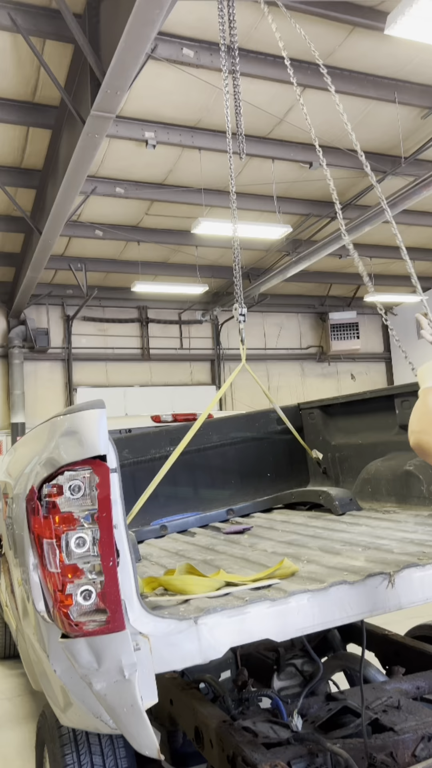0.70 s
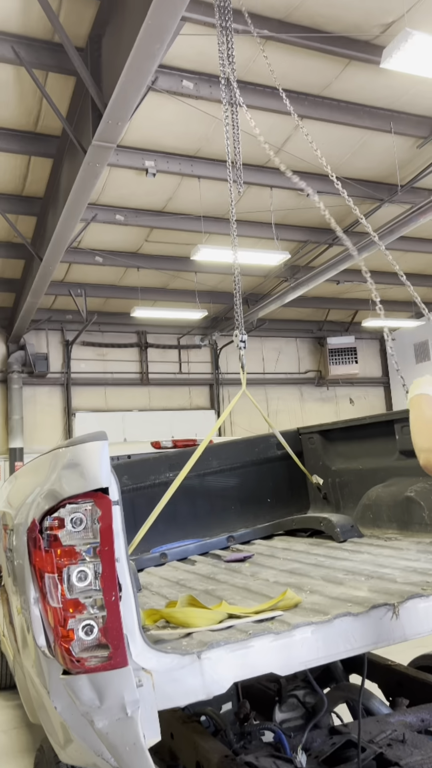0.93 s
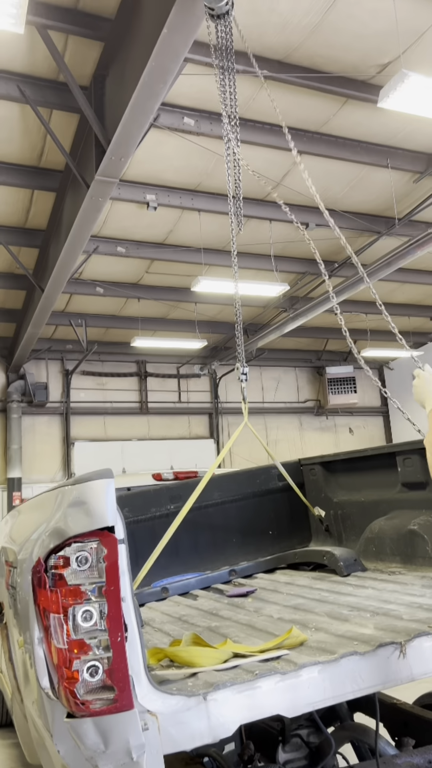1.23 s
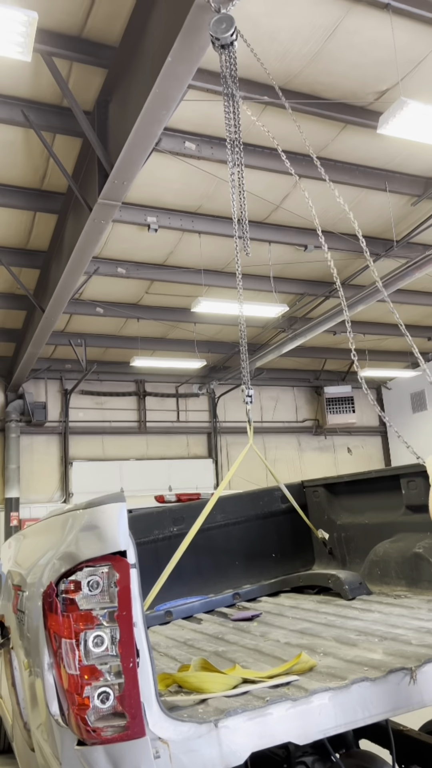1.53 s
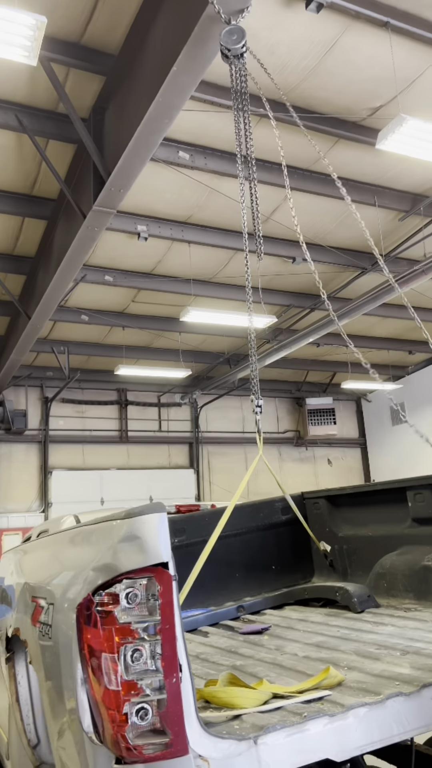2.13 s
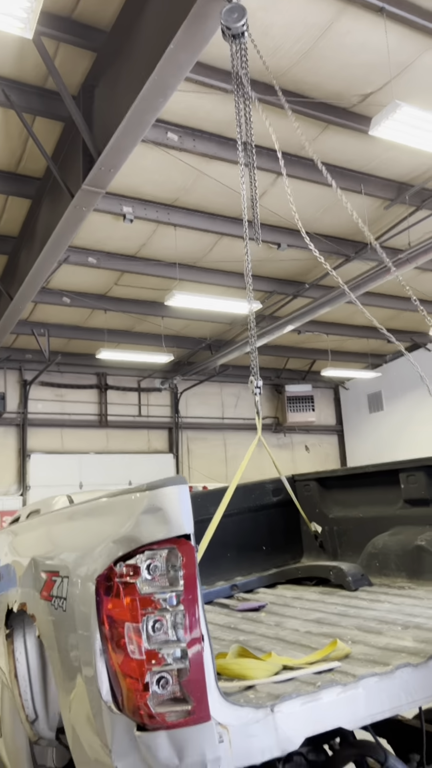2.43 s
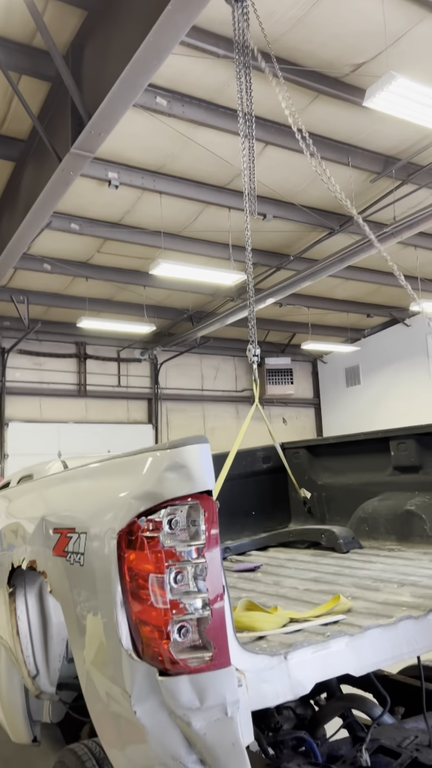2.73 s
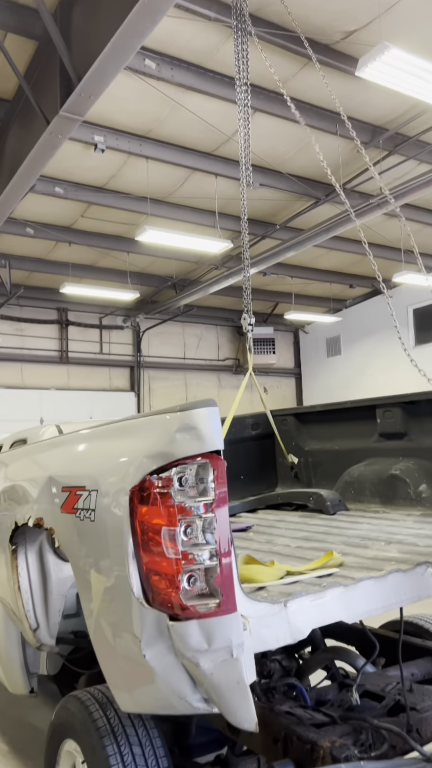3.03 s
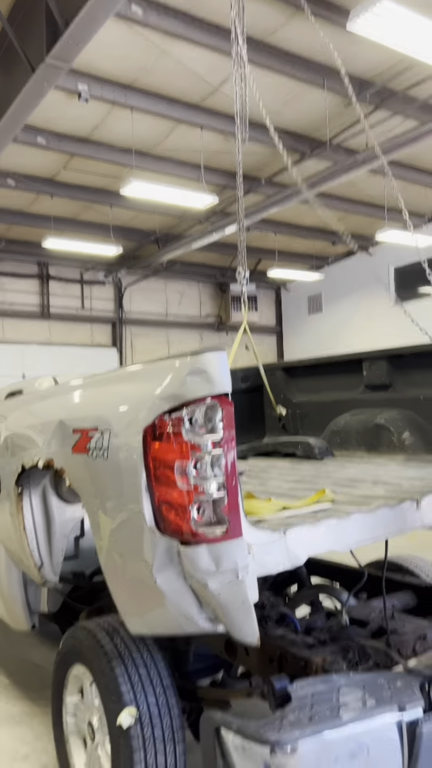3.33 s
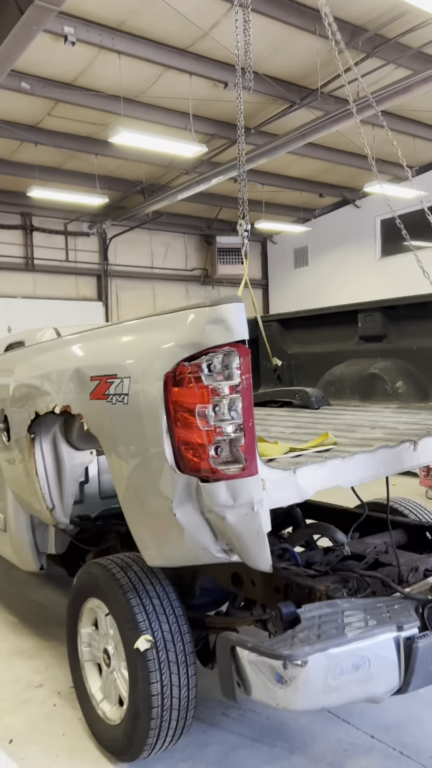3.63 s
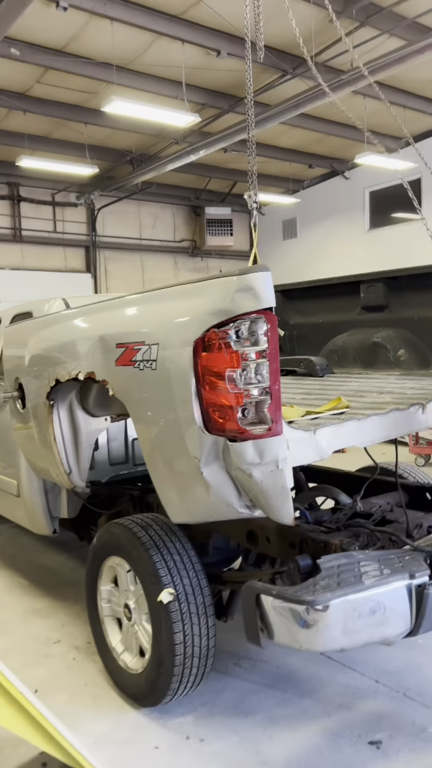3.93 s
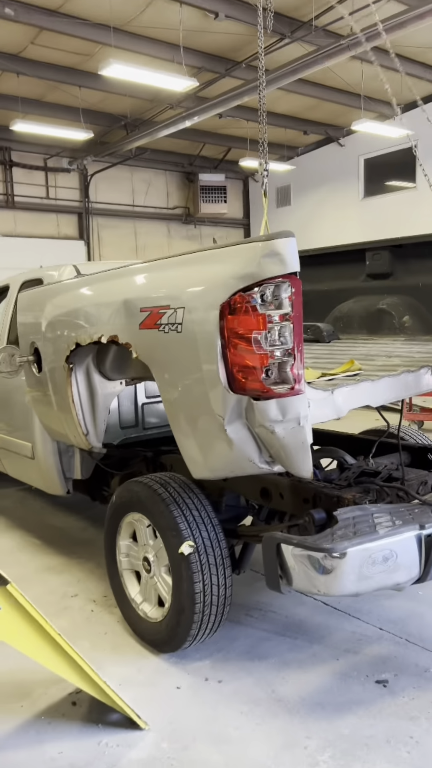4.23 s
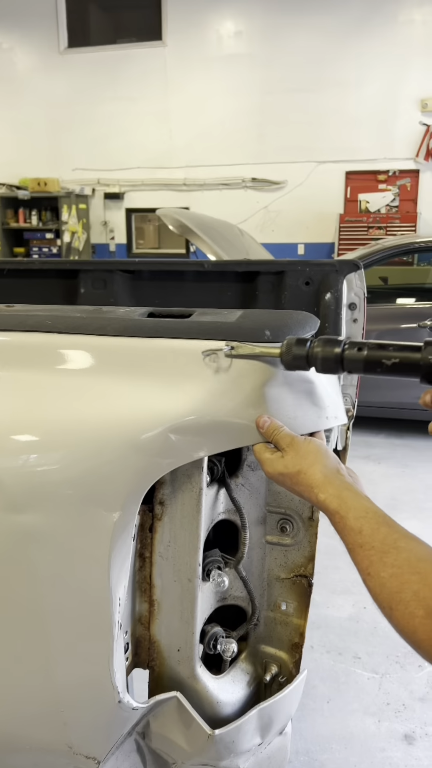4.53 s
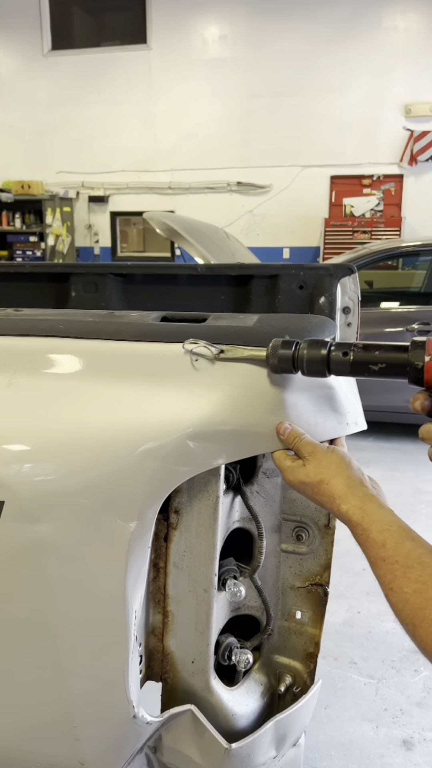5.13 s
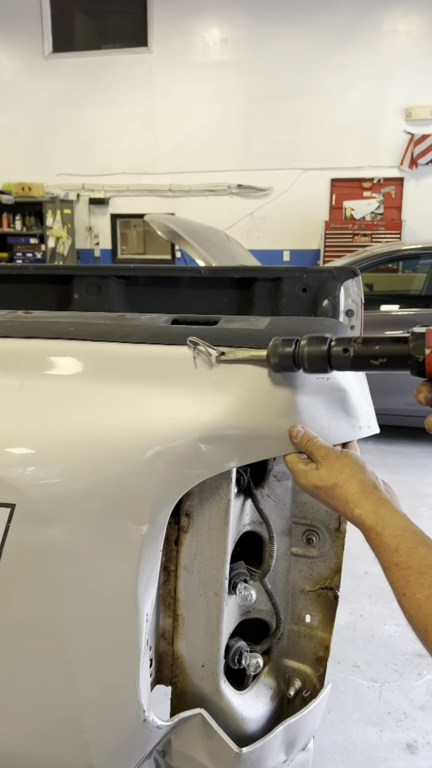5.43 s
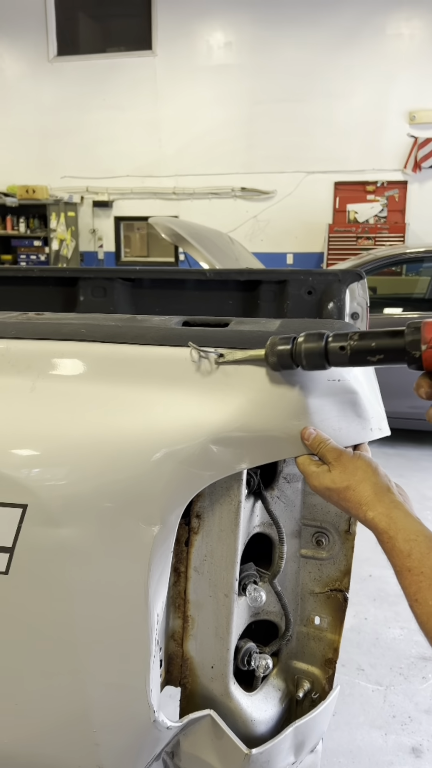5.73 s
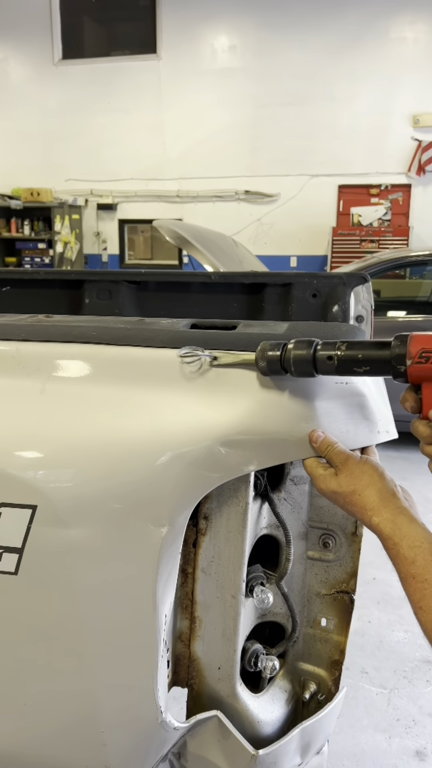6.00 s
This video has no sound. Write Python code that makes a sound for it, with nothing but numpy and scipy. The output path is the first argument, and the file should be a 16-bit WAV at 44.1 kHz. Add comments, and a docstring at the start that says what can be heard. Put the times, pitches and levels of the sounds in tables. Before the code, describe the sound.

A chain hoist clinks and rattles in repeated pulls, then a pneumatic hammer abruptly starts chiseling sheet metal close by.

```python
"""Chain hoist and pneumatic hammer in a body shop.

A chain is hauled hand over hand under a steel roof; each impact excites the modes of the links
and the hoist's housing, and the hall reverberates. Then, abruptly, a pneumatic hammer close by
drives its chisel into the sheet-metal side of a truck bed, about thirty blows a second, slowing
while it is leaned on harder. The sheet radiates bending waves as it rings, buckles and tears."""
import sys
import numpy as np
from scipy import signal
from scipy.fft import rfft, irfft
from scipy.io import wavfile
from scipy.ndimage import uniform_filter1d

SR = 44100
rng = np.random.default_rng(int(sys.argv[2]) if len(sys.argv) > 2 else 0)


def transcribe(signal):
    """Save signal, clipped to [-1, 1], as a 16-bit WAV file at the path in sys.argv[1]."""
    frames = np.atleast_2d(signal).T
    limited = np.clip(frames, -1, 1)
    pcm = np.round(limited * 32767).astype(np.int16)
    wavfile.write(sys.argv[1], SR, pcm)


N = 377496

FIRST_BLOW_S, CREASE_GIVES_S = 4.4708, 4.78
SLACK_DB = -46  # the chain keeps jingling between pulls

# Levels in all tables are relative: each source applies its own gain.
# force of the hammer's blows: (time [s], level [dB])
BLOW_FORCE = [(4.47, -21), (4.505, -25.5), (4.545, -26.5), (4.9, -25), (5.6, -26), (5.93, -28),
              (6.04, -26.5), (6.4, -27), (6.57, -28), (6.95, -27.5), (7.2, -28), (7.32, -29), (7.5, -27),
              (7.8, -27.5), (8.0, -28), (8.15, -27.5), (8.5, -28)]
# blows that dig in: (time [s], extra strength [dB], thump level [dB])
DEEP_BLOWS = [(4.54, 2, -28), (4.572, 3, -22), (4.604, 2.5, -24), (4.637, -1, -20), (4.702, 4.5, -19),
              (4.735, 0.5, -23), (4.767, 1, -20.5), (5.255, 0.5, -37), (7.12, -0.5, -26)]
# links striking the hoist: (time [s], level [dB], weight of the low ring [dB],
# low note [Hz], its level [dB], high note [Hz], its level [dB])
LINK_IMPACTS = [(0.162, -21.5, -35, 3630, -42, 4810, -42), (0.1908, -16, -25, 3640, -39, 4800, -33),
                (0.2411, -19, -22, 3590, -39, 4700, -31), (0.29, -11, -18, 3670, -41, 4750, -29),
                (0.3238, -16, -13, 3670, -32, 4760, -24.5), (0.5831, -16.5, -14, 3590, -39, 4900, -34),
                (0.6394, -13, -17, 3600, -24, 4840, -31), (0.6839, -12, -6, 3640, -22, 4790, -39),
                (0.8814, -20, -18, 3400, -50, 4780, -46), (0.9175, -18.5, -10, 3530, -47, 4800, -36),
                (0.9841, -20.5, -11, 3570, -46, 4760, -35), (1.042, -10.5, -16, 3610, -43, 4270, -33),
                (1.09, -12.5, -10, 3640, -30, 4320, -37), (1.135, -30, -20, 3420, -32, 4320, -42),
                (1.2371, -23, -31, 3370, -42, 4760, -43), (1.2665, -18, -29, 3410, -43, 4820, -28),
                (1.314, -15.5, -5, 3550, -44, 4800, -31), (1.357, -20.5, 7, 3560, -44, 4810, -30),
                (1.4104, -13.5, -7.5, 3640, -41, 4750, -24), (1.6265, -21.5, -12, 3610, -51, 4380, -39),
                (1.6823, -18.5, -2, 3650, -47, 4270, -39), (1.7404, -15.5, -4, 3430, -43, 4820, -32),
                (1.7898, -15, -5, 3570, -46, 4130, -41), (1.9864, -22, -6, 3650, -50, 4770, -40),
                (2.127, -17.5, 11, 3630, -36, 4740, -39), (2.1545, -19, -8, 3350, -41, 4350, -29),
                (2.2021, -21, -2, 3630, -34, 4700, -36), (2.4226, -19, 7, 3560, -41, 4600, -44),
                (2.4784, -14, -11, 3570, -30, 4770, -33), (2.5208, -15, -5, 3570, -27, 4760, -26),
                (2.7172, -15, -4, 3640, -44, 4680, -33), (2.814, -24, -20, 3560, -40, 4220, -28),
                (2.876, -10, -4.5, 3470, -34, 4600, -35), (2.935, -15, -3, 3510, -41, 4710, -46),
                (3.134, -23.5, -30, 3390, -46, 4820, -46), (3.21, -21.5, -31, 3370, -51, 4730, -39),
                (3.2638, -14, -10, 3390, -30, 4780, -43), (3.3084, -15.5, -12, 3400, -29, 4720, -40),
                (3.5161, -19.5, -4, 3540, -43, 4150, -46), (3.5924, -21, -8, 3320, -46, 4710, -40),
                (3.6592, -14.5, -9, 3630, -38, 4250, -32), (3.6847, -13.5, -25, 3320, -36, 4740, -26),
                (3.7205, -24, -28, 3420, -25, 4820, -33), (4.079, -14, -11, 3640, -37, 4750, -29),
                (4.1593, -20.5, 6, 3620, -34, 4640, -41), (4.3785, -27, -11, 3410, -45, 4360, -44)]
# modes of the links and housing: (frequency [Hz], bandwidth [Hz], level [dB])
HOIST_MODES = [(455, 84, -15), (735, 41, -7), (923, 46, -3), (1080, 77, -11), (1555, 86, -7.5),
               (1705, 57, -6), (2530, 100, -10), (3440, 180, -7.5), (3590, 234, -7), (4257, 215, -7.5),
               (4750, 70, -2.5), (5260, 43, -8), (6370, 230, -2), (7040, 120, -3.5), (7820, 580, -7.5),
               (8550, 80, -23), (8440, 54, -1.5), (8950, 680, -11), (10760, 780, -15), (14200, 2500, -69)]


def hammer():
    """Direct and reverberant sound: sheet and chisel are close, and the boom is mostly direct."""
    blows = blow_times()
    sheet = panel(blows) + singing(blows) + clangs(blows) + thumps(blows) + tearing(blows)
    steel = chisel(blows) + shove(blows) + pings(blows)
    carried = colour(sheet, 1 / np.sqrt(1 + (480 / (bins() + 1)) ** 2))
    return sheet + steel + hall(gain_of(-2) * carried + gain_of(-11.5) * steel) + buffeting()


def blow_times():
    """Quasi-periodic excitation: the piston strikes once a cycle, less regularly under load."""
    # speed of the piston: (time [s], blow rate [Hz])
    blow_rate = [(4.47, 29.05), (4.726, 31.22), (5.259, 30.23), (5.508, 30.5), (5.698, 29.84),
                 (5.904, 31.3), (6.373, 31.5), (6.739, 30.6), (6.88, 30.89), (7.169, 27.27), (7.457, 28.59),
                 (7.603, 26.12), (7.748, 28.06), (7.905, 27.45), (7.98, 28.33), (8.477, 30.91)]
    t = np.arange(FIRST_BLOW_S, N / SR, 1 / SR)
    cycles = np.cumsum(follow(blow_rate, t)[0]) / SR
    blows = np.interp(np.arange(cycles[-1]), cycles, t)
    jitter_s = .00003 + .0005 * leaning(blows) ** 2
    return blows + jitter_s * rng.standard_normal(len(blows))


def leaning(t):
    """Static load: how hard the hammer is leaned on at the times t."""
    # pressure on the tool: (time [s], load [0-1])
    load = [(4.5, 0.64), (4.8, 0.24), (5.5, 0.02), (6.3, 0.14), (6.85, 0.43), (7.05, 0.83), (8.18, 0.88),
            (8.3, 0.14), (8.56, 0.15)]
    return np.clip(follow(load, t)[0], 0, 1)


def panel(blows):
    """Modal response: each blow rings the sheet; load damps the boom and brings out the clang."""
    # bed side: (frequency [Hz], bandwidth [Hz], level unloaded [dB], level loaded [dB])
    panel_modes = [(156.5, 18, 2, -2), (189, 23, 3.5, 2.5), (218.2, 15, 5, 4.5), (256, 10, 2, -10),
                   (302, 29, 2, -5), (383, 43, -0.5, 3.5), (447, 34, -3, -15), (571, 65, -4.5, -6),
                   (652, 35, -6, -1.5), (740, 120, -6, -2), (840, 230, -7.5, -8), (927, 26, -2.5, -9),
                   (1130, 120, -14.5, -7), (1390, 21, -5.5, -6), (1400, 90, -18, -41),
                   (1690, 530, -18, -14), (2290, 430, -13.5, -16), (2745, 210, -16, -15),
                   (3460, 370, -41, -35)]
    # crease that the chisel first bites into: (frequency [Hz], bandwidth [Hz], level [dB])
    crease_modes = [(256, 17, 3.5), (462, 30, -5), (950, 76, -4), (1191, 51, 0.5), (1470, 180, -8),
                    (2650, 60, -14)]
    lean, f = leaning(blows)[:, None], bins() + 1
    hz, width, light_db, leaned_db = np.transpose(panel_modes)
    hz = hz[:, None, None] * (1 - 0.012 * (lean - lean.mean()))  # buckling lowers the modes
    light, leaned = resonances(zip(hz, width, light_db)), resonances(zip(hz, width, leaned_db))
    crease_ring = gain_of(crease(blows))[:, None] * resonances(crease_modes)
    gain = np.hypot((1 - lean) * light + lean * leaned, crease_ring)
    gain /= np.sqrt(1 + (125 / f) ** 8)  # a thin sheet radiates little bass
    skid_db = 7.5 * np.exp(-(blows - FIRST_BLOW_S) / 0.047)  # bright skids on paint until the tip seats
    gain *= gain_of(skid_db[:, None] / (1 + (950 / f) ** 6))
    rings = irfft(causal(gain)[:, None] * edge_reflections(blows))
    uneven_db = (0.5 + 0.6 * leaning(blows)) * rng.standard_normal(len(blows))
    bite_db = sum(db * np.exp(-.5 * ((blows - s) / 0.012) ** 2) for s, db, _ in DEEP_BLOWS)
    level_db = follow(BLOW_FORCE, blows)[0] + uneven_db + bite_db
    out = np.zeros((2, N))
    for s, db, ring in zip(blows, level_db, rings):
        add(out, s, gain_of(db - 10) * evened(ring))
    return out


def edge_reflections(blows, return_s=.0072, smooth_bins=24):
    """Dispersion: bending waves return from the edges with a different delay at each frequency."""
    noise = rng.standard_normal((len(blows) + 1, 2, len(bins()), 2))
    noise = evened(uniform_filter1d(uniform_filter1d(noise, smooth_bins, axis=2), smooth_bins, axis=2))
    lean = leaning(blows)[:, None, None]
    skate = lean[..., None] ** 2  # under load the chisel skates, shifting the wave paths
    creep = np.cumsum((0.012 + 0.06 * skate) * noise[1:], axis=0)
    jitter = (0.003 + 0.045 * skate) * noise[1:]
    paths = evened(noise[0] + creep + jitter)
    linger = 1 - .35 * lean / (1 + (bins() / 1000) ** 4)  # pressure deadens the low echoes
    group_delay = return_s * linger * (.18 + .82 * np.mean(paths ** 2, axis=-1))
    return np.exp(-2j * np.pi * np.cumsum(group_delay, axis=-1) * bins()[1])


def crease(t, rise_db_per_s=40, fall_db_per_s=19.5):
    """Resonance level in dB: the crease rings ever more freely, gives way and is beaten down."""
    since = t - CREASE_GIVES_S
    return 5 + np.minimum(rise_db_per_s * since, -fall_db_per_s * since)


def singing(blows, decay_s=0.016, fade_s=0.19):
    """Selective excitation: single modes ring out as the creeping chisel passes their spot."""
    # sheet modes, silent unless end follows start: (start [s], end [s], frequency [Hz], level [dB])
    sung_modes = [(4.7, 4.6, 345, -30), (4.7, 5.2, 235, -23), (4.5, 5.15, 985, -33), (5.3, 5.7, 770, -43),
                  (4.4, 5.1, 765, -25.5), (4.644, 4.5, 1173, -37), (5.4, 5.2, 1245, -36),
                  (5.2, 6, 942, -31), (5.1, 5.6, 680, -31), (5.847, 7.5, 900, -39), (6, 7.203, 765, -30.5),
                  (5.9, 6.6, 291, -33.5), (5.8, 6.95, 211.8, -31), (8.22, 8.8, 185, -24)]
    t, out = np.arange(4096) / SR, np.zeros((2, N))
    envelope = np.exp(-t / decay_s) * (1 - np.exp(-t / 0.0017))
    for start, end, hz, db in sung_modes:
        for s in blows[(blows > start) & (blows < end)]:
            sunk_hz = hz * (1 - 0.021 * (s - (start + end) / 2))  # the cut slackens the sheet
            ring = envelope * np.sin(2 * np.pi * sunk_hz * t + [[0], [1]])
            swell = min(1, (s - start) / fade_s, (end - s) / fade_s)
            add(out, s, swell * gain_of(db + 0.85 * rng.standard_normal()) * ring)
    return out


def clangs(blows, hz=714, scatter_hz=24, swell_s=0.0031):
    """Buckling: under heavy load each blow gives a hollow clang that dies before the next."""
    # strength of the buckling: (time [s], level [dB])
    buckling = [(6.6, -48), (6.95, -25), (7.15, -28.5), (7.5, -23.5), (7.85, -24), (8.05, -31), (8.56, -34)]
    t, out = np.arange(2048) / SR, np.zeros((2, N))
    swell = t / swell_s * np.exp(1 - t / swell_s)
    for s, db in zip(blows, follow(buckling, blows)[0]):
        detune, uneven_db, phase = rng.standard_normal(3)
        wave = swell * np.sin(2 * np.pi * (hz + scatter_hz * detune) * t + phase + [[0], [1]])
        add(out, s, gain_of(db + uneven_db) * wave)
    return out


def thumps(blows, swell_s=0.0058):
    """Plastic deformation: a blow that digs in dents the sheet with a thump of falling pitch."""
    t, out = np.arange(3000) / SR, np.zeros((2, N))
    hz = 135 + 300 * np.exp(-t / 0.0046)
    wave = np.sin(2 * np.pi * np.cumsum(hz) / SR) * t / swell_s * np.exp(1 - t / swell_s)
    for s, _, db in DEEP_BLOWS:
        nearest_blow = blows[np.argmin(abs(blows - s))]
        add(out, nearest_blow, gain_of(db) * np.outer([1, .3], wave))
    return out


def tearing(blows, half_width_hz=250, decay_s=0.0074):
    """Fracture: each blow rips the steel further, a narrow-band screech that glides as the tear runs."""
    # tears: (start [s], end [s], first frequency [Hz], last frequency [Hz], level [dB])
    tears = [(4.47, 4.68, 3680, 3700, -35), (4.78, 5.22, 2190, 2110, -32.5),
             (4.959, 6.0, 2710, 2455, -31.5), (5.18, 5.52, 3970, 4050, -45),
             (6.45, 6.978, 2730, 2700, -34.5), (7.03, 7.498, 3620, 3450, -35.5)]
    t, out = np.arange(2048) / SR, np.zeros((2, N))
    for start, end, first_hz, last_hz, db in tears:
        for s in blows[(blows > start) & (blows < end)]:
            run = (s - start) / (end - start)
            hz = first_hz + (last_hz - first_hz) * run
            band = 1 / (1 + ((bins(len(t)) - hz) / half_width_hz) ** 2)
            rasp = evened(irfft(rfft(rng.standard_normal((2, len(t)))) * band))
            add(out, s, gain_of(db) * np.sqrt(np.sin(np.pi * run)) * np.exp(-t / decay_s) * rasp)
    return out


def chisel(blows, lead_s=.0036):
    """Broadband impact noise: a spit of air, the crack of piston on chisel, then a fading sizzle."""
    # spectrum of steel striking steel: (frequency [Hz], level [dB])
    steel_spectrum = [(300, -0.5), (1500, 2.5), (2700, -3.5), (4200, 0), (5100, -10.5), (6100, 1),
                      (7000, 1.5), (7900, 2.5), (9000, -1), (11000, -3), (16000, 0.5)]
    t, out = np.arange(2400) / SR - lead_s, np.zeros((2, N))
    crack = 0.96 * np.exp(-abs(t) / 0.0003)
    air = 0.5 * (t < 0)
    sizzle = 0.64 * (t >= 0) * np.exp(-np.maximum(t, 0) / 0.012)
    for s, db in zip(blows, follow(BLOW_FORCE, blows)[0] + 2.5 * leaning(blows)):
        envelope = crack * gain_of(0.81 * rng.standard_normal()) + air + sizzle
        add(out, s - lead_s, gain_of(db + 5) * envelope * rng.standard_normal((2, len(t))))
    return colour(out, evened(gain_of(read(steel_spectrum, bins()))))


def shove(blows, width_s=0.000085):
    """Rarefaction: each blow snaps the sheet inward, one sharp dip in pressure before any ringing."""
    u = np.arange(200) / SR / width_s
    dip, out = -(1 - u) * np.exp(-u), np.zeros((2, N))
    for s, db in zip(blows, follow(BLOW_FORCE, blows)[0] - 4 * leaning(blows)):
        add(out, s, gain_of(db + 13.5) * np.outer([1, 0], dip))
    return out


def pings(blows, rise_hz_per_s=680, decay_s=0.0017):
    """Damped vibration: the chisel's tip rings, rising as it sinks in and fading with the crease."""
    t, out = np.arange(1024) / SR, np.zeros((2, N))
    for s, db in zip(blows, follow(BLOW_FORCE, blows)[0] + .5 * crease(blows)):
        detune, centre, side = rng.standard_normal(3)
        hz = 7750 + rise_hz_per_s * (s - CREASE_GIVES_S) + 90 * detune
        ring = np.sin(2 * np.pi * hz * t) * np.exp(-t / decay_s)
        add(out, s, gain_of(db + 5.5) * np.outer([1 + 0.27 * centre, .5 * side], ring))
    return out


def knocks():
    """Antiphase pulses: some blows bring a low knock of falling pitch, opposite in the two ears."""
    # low knocks: (time [s], level [dB])
    knock_levels = [(4.509, -14), (4.543, -14), (4.608, -18), (4.676, -16), (4.7405, -17), (5.293, -16),
                    (5.525, -26), (5.9832, -14), (6.045, -24), (6.622, -18), (6.653, -20), (6.755, -21),
                    (6.9142, -21), (7.0165, -26), (7.3, -19), (7.336, -21), (7.408, -24), (7.514, -24),
                    (8.0237, -24), (8.302, -24), (8.4001, -28)]
    t, out = np.arange(1500) / SR, np.zeros((2, N))
    hz = 110 + 800 * np.exp(-t / 0.00304)
    swell = (t / 0.0048) ** 2 * np.exp(2 - 2 * t / 0.0036)
    wave = swell * np.sin(2 * np.pi * np.cumsum(hz) / SR)
    for s, db in knock_levels:
        add(out, s - .0045, gain_of(db + 6.5) * np.array([wave, -wave]))
    return out


def buffeting(gust_s=0.026):
    """Amplitude-modulated noise: a low rumble under the hammering, swelling in brief gusts."""
    # gusts: (time [s], level [dB])
    gusts = [(4.68, -40), (4.78, -35), (5.28, -36), (7.13, -39), (7.45, -40), (7.67, -46), (8.179, -43),
             (8.32, -58)]
    t = np.arange(N) / SR
    steady = gain_of(-48.5 - 5.5 * leaning(t))  # quieter while the tool is leaned on
    gusting = sum(gain_of(db) / (1 + ((t - s) / gust_s) ** 2) ** 2 for s, db in gusts)
    rumble = evened(colour(rng.standard_normal((2, N)), resonances([(67.5, 107, 0)]) ** 2))
    return rumble * (steady + gusting) * gain_of(3)


def hoist():
    """Impact excitation: knocks and ticks ring the chain and its housing, high up in the hall."""
    steel = walk(clanks() + colour(rattle(), evened(resonances(HOIST_MODES))))
    notes = clinks()
    return steel + notes + gain_of(-4) * shifting_hall(steel + .5 * notes) + drone()


def clanks():
    """Modal response: each link lands and chatters as it seats; heavy ones wake the housing."""
    t, out = np.arange(4096) / SR, np.zeros((2, N))
    envelope = (np.exp(-t / 0.0082) + 0.34 * np.exp(-t / 0.044)) * (1 - np.exp(-t / 0.00094))
    housing = 1 / (1 + (bins() / 2300) ** 4)
    usual_db = np.median(np.array(LINK_IMPACTS)[:, 2])
    hz, width, mode_db = np.transpose(HOIST_MODES)
    for s, db, weight_db, *_ in LINK_IMPACTS:
        knock = rfft(envelope * rng.standard_normal((2, len(t))), 2 * len(t))
        shift, favour = rng.standard_normal((2, len(hz)))  # each spot detunes and favours other modes
        modes = zip(hz + .4 * width * shift, width, mode_db + 2.5 * favour)
        ring = causal(evened(resonances(modes)))
        add(out, s, irfft(knock * ring * gain_of(db - 7.5 + 0.5 * (weight_db - usual_db) * housing)))
    return out


def clinks(overtones=5, note_decay_s=0.029):
    """Free vibration: every struck link sings its own two notes, with a few brief overtones."""
    t, out = np.arange(8192) / SR, np.zeros((2, N))
    for s, db, _, low_hz, low_db, high_hz, high_db in LINK_IMPACTS:
        hz = rng.uniform(4900, 9800, (overtones, 1))
        rings = np.sin(2 * np.pi * hz * t) * np.exp(-t / 0.0041)
        add(out, s, gain_of(db - 17) * rng.standard_normal((2, overtones)) @ rings)
        for note_hz, note_db in (low_hz, low_db), (high_hz, high_db):
            note = np.sin(2 * np.pi * (note_hz * t + rng.random((2, 1)))) * np.exp(-t / note_decay_s)
            add(out, s, gain_of(note_db - 1) * note)
    return out


def rattle(ticks_per_s=260):
    """Shot noise: links tick against each other at random; under load they shake the housing too."""
    strength = gain_of(4.4 * np.minimum(rng.exponential(1, N), 3.3))
    ticks = strength * (rng.random(N) < ticks_per_s / SR)
    power = signal.lfilter([1], [1, -np.exp(-1 / (0.0024 * SR))], ticks ** 2)
    chatter = evened(np.sqrt(power) * rng.standard_normal((2, N)))
    housing = 1 / (1 + (bins() / 2300) ** 6)
    light = gain_of(haul() - 2) * colour(chatter, np.sqrt(1 - housing))
    heavy = gain_of(haul(unload_db_per_s=67) + 1) * colour(chatter, np.sqrt(housing))
    return light + heavy


def haul(unload_db_per_s=0, speed_up_db_per_s=82, run_out_db_per_s=78):
    """Power summation: the chain's level in dB, as each pull builds up speed and runs out."""
    # hand-over-hand pulls at their fastest: (time [s], level [dB])
    pulls = [(-0.02, -25.5), (0.3, -27), (0.68, -26), (1.07, -29), (1.41, -28), (1.77, -25.5), (2.13, -26),
             (2.5, -27), (2.85, -28.5), (3.29, -27.5), (3.699, -26.5), (4.111, -27.5), (4.5, -24)]
    t, power = np.arange(0, N, 64) / SR, gain_of(SLACK_DB) ** 2
    for s, db in pulls:
        before, after = np.maximum(s - t, 0), np.maximum(t - s, 0)
        pull_db = db - speed_up_db_per_s * before - (run_out_db_per_s + unload_db_per_s) * after
        power = power + gain_of(pull_db) ** 2
    return np.interp(np.arange(N) / SR, t, 10 * np.log10(power))


def walk(x):
    """Listening position: on the way round the truck the housing's low ring grows, its upper recedes."""
    # housing's rings: (frequency [Hz], bandwidth [Hz], starting gain [dB], change [dB/s])
    housing_rings = [(1000, 240, 1.5, 0.5), (1580, 1300, 3, -1.66)]
    t, out = np.arange(N) / SR, x
    for hz, width, start_db, db_per_s in housing_rings:
        ring = 1 / (1 + ((bins() - hz) / (width / 2)) ** 4)
        band = signal.oaconvolve(x, np.fft.fftshift(irfft(ring))[None, 1:], "same", axes=1)
        out = out + band * (gain_of(start_db + db_per_s * t) - 1)
    return out


def shifting_hall(x, tails=3, period_s=1.298):
    """Time-varying reverberation: tails fade in turn, so the colour shifts and no fixed pitch rings."""
    phase = 2 * np.pi * np.arange(N) / SR / period_s
    return sum(hall(x * np.cos(phase + np.pi * k / tails)) for k in range(tails)) * np.sqrt(2 / tails)


def hall(x):
    """Reverberation: sparse reflections of random sign, each band decaying at its own rate."""
    # decay of the hall: (frequency [Hz], time to fall 60 dB [s])
    reverb_times = [(100, 1), (1000, 0.46), (4000, 0.69), (8000, 0.32), (16000, 0.018)]
    taps = rng.choice([-1., 1.], (2, SR)) * (rng.random((2, SR)) < .1)
    hz, t, spectra = signal.stft(taps, SR, nperseg=256)
    build_up = 1 - np.exp(-t / 0.0063)
    decay = gain_of(-60 * t / read(reverb_times, hz)[:, None])
    tail = signal.istft(spectra * build_up * decay, SR, nperseg=256)[1]
    return signal.fftconvolve(x, tail / np.linalg.norm(tail[0]), axes=1)[:, :N]


def drone():
    """Amplitude-modulated noise: a low rumble in the hall that swells with each pull."""
    # spectrum of the rumble: (frequency [Hz], level [dB])
    rumble_spectrum = [(15, -43), (35, -18), (52, -8), (68, 1.5), (85, -2.5), (110, -10), (135, -10.5),
                       (175, -7.5), (230, -18.5), (350, -19.5), (700, -21.5), (2000, -24.5), (16000, -29)]
    rumble = evened(colour(rng.standard_normal((2, N)), gain_of(read(rumble_spectrum, bins()))))
    return rumble * gain_of(-41 + 0.49 * (haul() - SLACK_DB))


def spread(pair, width):
    """Sum and difference: a centre and a side signal become left and right."""
    # the highest treble has almost no centre: (frequency [Hz], centre gain [dB])
    centre_gain = [(11400, -1), (11800, -10), (12300, -38), (16000, -43)]
    centre = colour(pair[:1], gain_of(read(centre_gain, bins())))[0]
    side = colour(pair[1:], gain_of(read(width, bins())))[0]
    return np.array([centre + side, centre - side])


def resonances(modes):
    """Second-order resonators, (frequency [Hz], bandwidth [Hz], level [dB]), summed in power."""
    f = bins() + 1
    powers = (gain_of(db) ** 2 / (1 + ((f * f - hz * hz) / (f * width)) ** 2) for hz, width, db in modes)
    return np.sqrt(sum(powers))


def causal(gain):
    """Minimum phase: the spectrum with this gain that rings only after it is struck."""
    log_gain = np.log(np.maximum(gain, 1e-5))
    mirrored = np.concatenate([log_gain, log_gain[..., -2:0:-1]], -1)
    return np.exp(np.conj(signal.hilbert(mirrored)))[..., :gain.shape[-1]]


def colour(x, gain):
    """Convolution of each channel with a causal filter."""
    return signal.oaconvolve(x, irfft(causal(gain))[None], axes=1)[:, :N]


def bins(size=8192):
    """Frequencies of a filter's bins."""
    return np.fft.rfftfreq(size, 1 / SR)


def gain_of(db):
    """Decibels to amplitude."""
    return 10 ** (np.asarray(db) / 20)


def evened(x):
    """Normalisation to rms 1."""
    return x / np.sqrt(np.mean(x ** 2) + 1e-20)


def read(points, hz):
    """Interpolation of a table at hz, on a log-frequency axis."""
    f, value = np.transpose(points)
    return np.interp(np.log(hz + 1), np.log(f + 1), value)


def follow(rows, t):
    """Interpolation of each column of a table at the times t."""
    s, *columns = np.transpose(rows)
    return [np.interp(t, s, column) for column in columns]


def add(mix, s, sound):
    """Superposition: mixes a two-channel sound in at s seconds."""
    part = mix[:, max(round(s * SR), 0):][:, :sound.shape[1]]
    part += sound[:, :part.shape[1]]


def scene(handover_s=4.463):
    """Stereo image: the hoist gives way to the hammer, a little to the left, with a brief dip in level."""
    # width of the hoist: (frequency [Hz], side gain [dB])
    hoist_width = [(70, -50), (120, -41), (200, -25), (380, -14), (700, -4.5), (1700, -8), (2600, -1.5),
                   (5200, -1.5), (6200, -21.5), (6900, -32), (7450, -20), (7700, -7), (10500, 0),
                   (16000, 2)]
    # width of the hammer: (frequency [Hz], side gain [dB])
    hammer_width = [(60, -16), (200, -32), (500, -11), (900, -10), (1750, -16.5), (2500, -3), (3800, -9.5),
                    (5100, 1.5), (6200, -20), (7350, -23), (7750, -5), (9000, -4), (11000, 1),
                    (16000, -0.5)]
    t = np.arange(N) / SR - handover_s
    fade_out, fade_in = np.clip(-t / 0.043, 0, 1), np.clip(t / 0.071, 0, 1)
    leftward = gain_of([[.4], [-.4]])
    hauling = fade_out * spread(hoist(), hoist_width)
    hammering = fade_in * leftward * spread(hammer(), hammer_width)
    return hauling + hammering + knocks()


def record(dry, cutoff_hz=15850):
    """Band limiting: a steep low-pass removes the highest treble."""
    low_pass = signal.firwin(511, cutoff_hz, window=("kaiser", 9), fs=SR)
    return signal.oaconvolve(dry, low_pass[None], "same")


dry = scene()
out = record(dry)
transcribe(out)
```